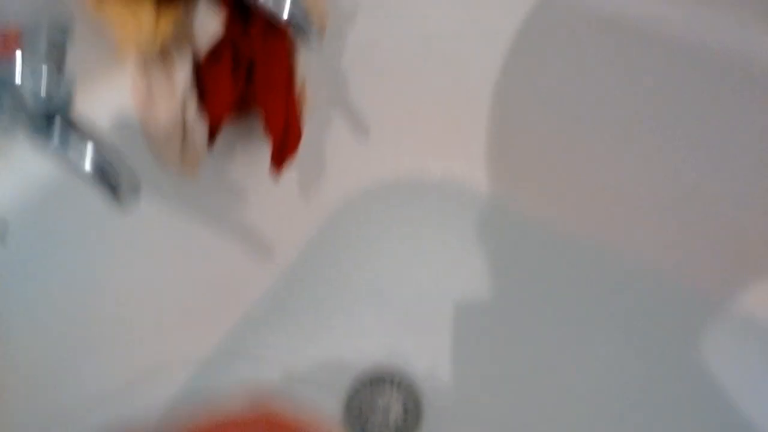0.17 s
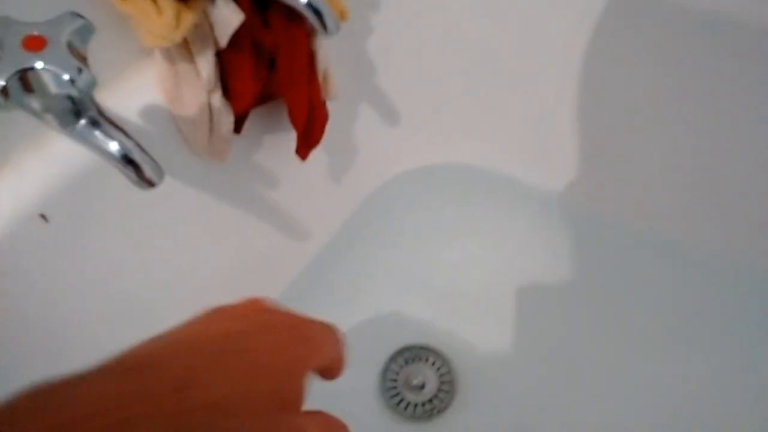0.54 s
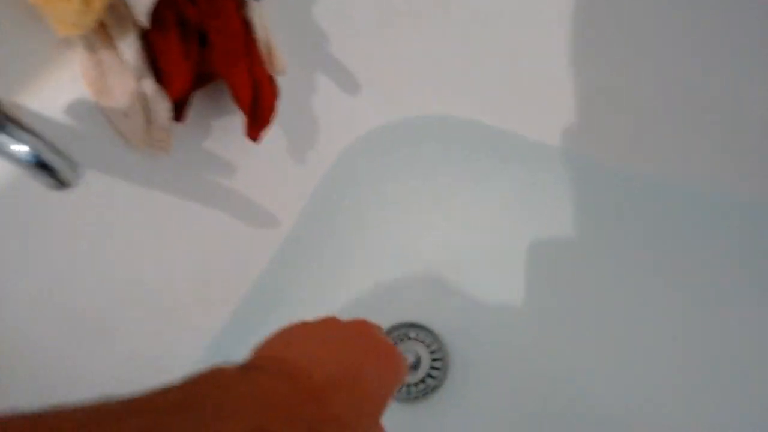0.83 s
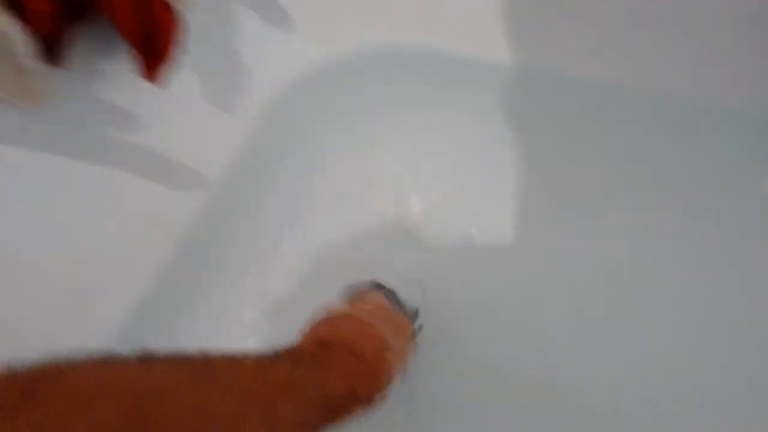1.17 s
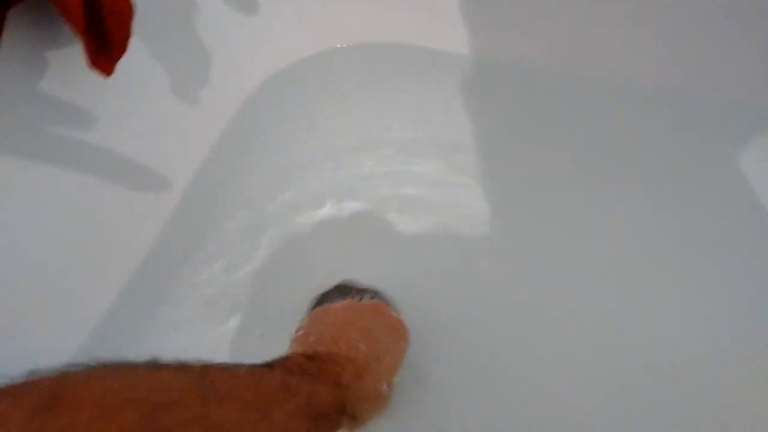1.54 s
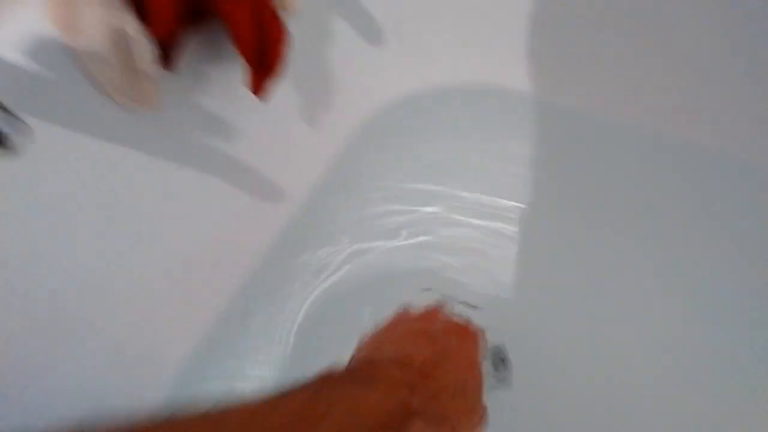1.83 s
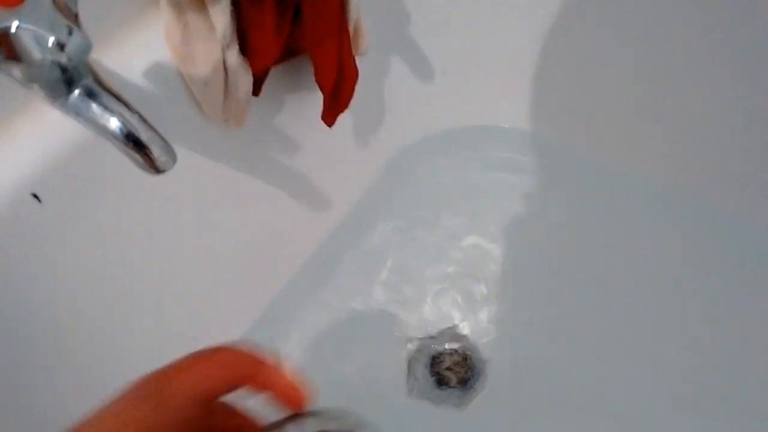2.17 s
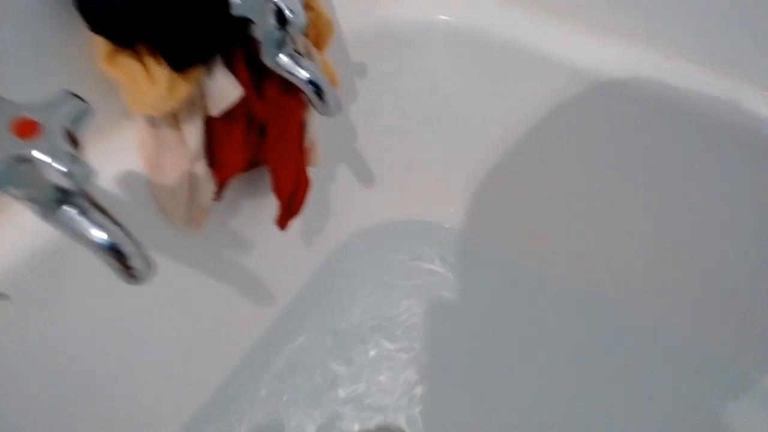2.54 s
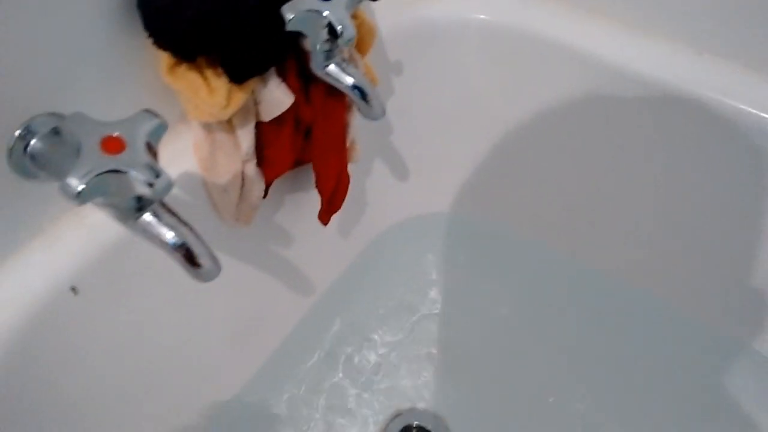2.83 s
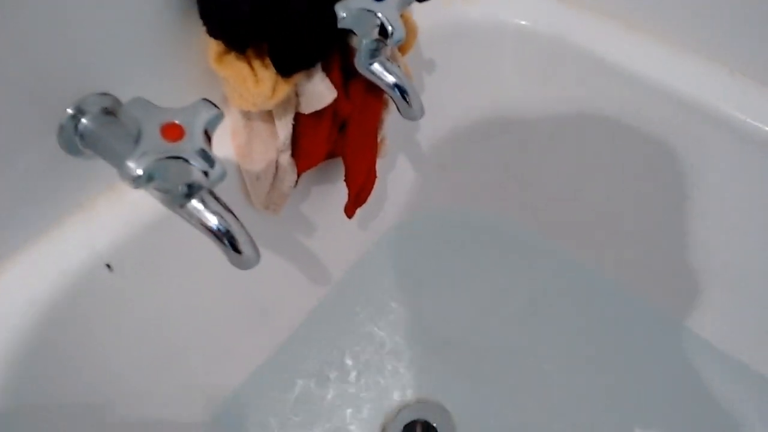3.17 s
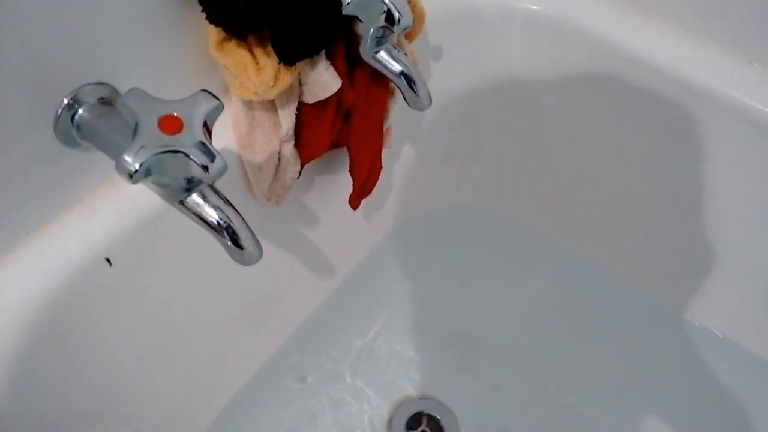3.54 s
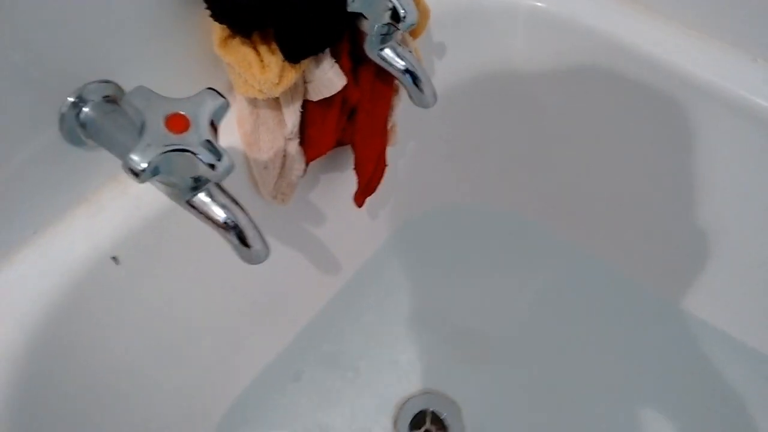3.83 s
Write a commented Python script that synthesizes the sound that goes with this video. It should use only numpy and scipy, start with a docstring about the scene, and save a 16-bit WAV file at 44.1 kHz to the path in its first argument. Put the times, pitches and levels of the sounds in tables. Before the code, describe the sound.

After faint dull knocks and one short splash, the plug comes out and bath water gulps and gurgles away with sharp bubble pops and a hollow pipe boom, heard close up in a short-echo bathroom.

```python
"""A small tiled bathroom: a hand bumps the tub, splashes into the bath water and lets it down the drain.
Bumps are noise-phased clusters of tub modes; splashes are slaps together with showers of droplet ticks.
Single bubbles are dying sines with a snap and froth; the gurgle and the vortex spray are crowds of them.
The waste pipe booms as resonances struck by random gulps. Hiss, rumble and a low hum lie underneath.
All but pipe and background ring in the room; the stereo left port hears treble late and is thinner."""
import sys
import numpy as np
from scipy import signal
from scipy.fft import rfft, irfft
from scipy.io import wavfile
from scipy.ndimage import uniform_filter1d

SR = 44100
rng = np.random.default_rng(int(sys.argv[2]) if len(sys.argv) > 2 else 0)


def output_pcm(signal):
    """Save a mono or channel-first signal as 16-bit PCM at the path in sys.argv[1].

    Samples are clipped to [-1, 1] before scaling.
    """
    pcm = np.clip(np.atleast_2d(signal).T, -1, 1) * 32767
    wavfile.write(sys.argv[1], SR, np.round(pcm).astype(np.int16))


N = 176400
T, HZ = np.arange(N) / SR, np.fft.rfftfreq(2 * N, 1 / SR)

# Background hiss and rumble: (frequency [Hz], relative density [dB per Hz])
HISS_COLOUR = [(25, -5), (47, 6.5), (70, -6), (150, -16.5), (480, -15), (1100, -26.5), (1950, -28.5),
               (2300, -40.5), (2900, -26.5), (4100, -30.5), (5000, -34), (11500, -30), (16000, -32)]
HISS_DB, HUM_HZ, HUM_DB = -47.5, 50.2, -51
START_S = 0.082  # the sound opens here
HISS_FADE_S, HISS_FADE_HZ = 0.15, 3280  # time constant of the treble fade-in; where treble begins

# Dull bumps and sloshes against the tub: (time [s], pitch [Hz], level [dB], decay to 1/e [s])
TUB_BUMPS = [(.092, 440, -44, 0.12), (0.333, 54.6, -39.5, 0.12), (0.393, 420, -46, 0.071),
             (0.551, 74, -38, 0.035), (2.72, 130, -31, 0.085), (2.93, 82.2, -32.5, 0.046),
             (1.761, 397, -48.5, 0.078), (1.825, 91, -43.5, 0.09), (2.401, 1080, -40, 0.013),
             (2.716, 414, -35.5, 0.03), (2.728, 1200, -29, 0.012), (3.971, 630, -34.5, .08),
             (2.362, 124, -34.5, 0.045), (3.819, 78, -32.5, 0.072), (3.85, 270, -34, 0.27)]
BUMP_WIDTH_OCTAVES, BUMP_ATTACK_S, BUMP_TOP_HZ = 0.34, 0.00037, 1860

# Loudness of the fine spray: (time [s], level [dB])
SPRAY_LEVEL = [(.1, -70.5), (.6, -61.5), (1.25, -66), (1.47, -43.5), (1.68, -66), (2.15, -64), (2.4, -51.5),
               (2.63, -56.5), (2.72, -40.5), (2.86, -43.5), (3.02, -44), (3.55, -51.5), (3.68, -46.5),
               (4, -52.5)]
# Colour of the fine spray: (frequency [Hz], relative level [dB])
SPRAY_TONE = [(2700, 2.5), (4800, -3), (11000, 7.5), (14500, 2)]
SPRAY_PER_S, SPRAY_SPREAD_DB, SPRAY_CYCLES = 1100, 3, 14  # cycles: mean length of a ring
TICKS_PER_S, TICK_SPREAD_DB, TICK_SHARE = 110, 5.5, 0.7  # share: tick gain beside the bursts

# Splashes and slurps: (time [s], level [dB], decay to 1/e [s], tilt [dB per octave])
SPLASH_EVENTS = [(.214, -50, 0.0027, 5), (1.402, -36, 0.0092, 0.5), (1.422, -39, 0.0037, -2),
                 (1.4272, -28.5, 0.014, 0.5), (1.452, -38, 0.011, -0.5), (1.805, -36.5, 0.0083, -5.5),
                 (2.206, -39, 0.036, -4.5), (2.3541, -27.5, 0.01, -4.5), (2.715, -35, 0.013, -2),
                 (2.757, -22.5, 0.0031, 10), (2.944, -33, 0.0043, 6.5), (3.009, -26, 0.0052, 7),
                 (3.0312, -27.5, 0.0033, 10), (3.133, -34.5, 0.01, 9), (3.349, -41.5, 0.0055, 5.5),
                 (3.641, -26, 0.0061, 24.5), (3.7929, -30, 0.00083, -0.5),]
# Colour of torn water: (frequency [Hz], relative level [dB])
SPLASH_COLOUR = [(60, -57), (300, -11.5), (800, -5), (1400, 4), (2400, -2.5), (4700, 2), (6500, -1),
                 (11000, 0), (16000, -6)]
DROPS_PER_S, DROP_SPREAD_DB = 4000, 3.5
CLUMP_DB = 2.5  # bunching of the droplets
SLAP, SLAP_S = 0.68, 0.007  # strength and 1/e length of the slap
CRACK, CRACK_UNDER_S = 9, 0.0044  # hard opening drop, strongest in splashes briefer than this decay

# Single bubbles, large and tiny: (time [s], pitch [Hz], level [dB], ring t60 [s])
SINGLE_BUBBLES = [(1.407, 1340, -27.5, 0.06), (1.4275, 1605, -22, 0.036), (1.4536, 10260, -26.5, 0.022),
                  (2.179, 380, -31, 0.063), (1.728, 520, -36, 0.014), (2.279, 1162, -27.5, 0.035),
                  (2.405, 515.5, -30.5, 0.17), (2.476, 2460, -31.5, 0.057), (2.682, 1510, -28, 0.12),
                  (2.683, 3070, -30.5, 0.023), (2.7165, 3050, -23, 0.017), (2.748, 710, -27, 0.097),
                  (2.877, 2885, -27.5, 0.03), (2.927, 460, -37, 0.12), (3.011, 3250, -25, 0.025),
                  (3.135, 1764, -20, 0.017), (3.276, 1046, -14, 0.078), (3.426, 811.5, -23.5, 0.16),
                  (3.471, 808, -30, 0.034), (3.5798, 919, -18, 0.048), (3.662, 6660, -33.5, 0.027),
                  (3.6877, 2320, -24, 0.043), (3.728, 465, -30.5, 0.16), (3.733, 4550, -31, 0.017),
                  (3.7918, 3240, -20, 0.014), (3.974, 4180, -37.5, 0.06)]
BUBBLE_RISE, BUBBLE_ATTACK_S = 0.0013, 0.00021  # share of pitch gained over one ring; pinch-off time
SHARP, SETTLE_S = 0.096, 0.0031  # share by which any new bubble starts high; time constant to settle
FROTH_DB, FROTH_DECAY_S, FROTH_OCTAVES = -10, 0.021, 0.22  # beside the ring, before thinning in low bubbles
SNAP_DB, SNAP_S = -0.5, 0.00007  # pinch-off snap, before softening in low bubbles

# Flow down the drain: (time [s], level [dB])
DRAIN_FLOW = [(2.12, -35), (2.2, -10), (2.27, -2.5), (2.33, -18.5), (2.4, -2.5), (2.49, -7), (2.63, -2),
              (2.76, 1), (2.84, -4.5), (3.25, -1), (3.75, -1), (3.88, -4.5), (4, -1)]
# Colour of the gurgle, by bubble pitch: (frequency [Hz], relative bubble level [dB])
GURGLE_COLOUR = [(190, -12.5), (300, 3), (620, 4), (1100, 1), (1900, 1.5), (2400, 1)]
GURGLE_DB = -39  # before the flow curve
BUBBLE_GLIDE = 0.13  # largest share by which a crowd bubble's pitch slides, up or down
GURGLE_PER_S, GURGLE_SPREAD_DB, GURGLE_CYCLES, GULP_DB = 600, 3, 34, 3

# Waste pipe and tub resonances: (frequency [Hz], width [Hz], level before the flow curve [dB])
PIPE_MODES = [(36.5, 2.2, -45), (71, 9.6, -44), (109.2, 20.5, -36.5), (165.7, 13.5, -39.5),
              (249, 36.4, -48), (313, 61, -45.5), (460, 9.2, -44.5)]

# Reverberation of the tiles: (frequency [Hz], t60 [s])
ROOM_T60 = [(100, 0.28), (1500, 0.25), (4000, 0.24), (15000, 0.19)]
ROOM_DB, GURGLE_ROOM_DB, BUBBLE_ROOM_DB, ROOM_GAP_S = -2.5, -3, -6, 0.005  # gap: silence before reflections
# Left-right likeness of diffuse sound: (frequency [Hz], likeness [0 to 1])
LIKENESS = [(30, 0.089), (500, 0.2), (1100, 1), (2200, 0.02)]
# Tone of the left port: (frequency [Hz], level [dB])
LEFT_PORT = [(25, -11), (125, -1), (500, 0), (2000, -2), (7500, -3), (12000, -10), (16000, -18)]
LEFT_LAG_S, LAG_FROM_HZ = 0.000361, 1640  # full treble lag of the left port; half of it at this frequency
EDGE_HZ = 15700  # upper band limit


def amp(db):
    """Decibels to gain."""
    return 10 ** (np.asarray(db) / 20)


def unit(x):
    """Scales to rms 1."""
    return x / np.sqrt(np.mean(x ** 2) + 1e-20)


def read(points, hz=HZ):
    """Reads a table on a log-frequency axis."""
    f, value = np.transpose(points)
    return np.interp(np.log(hz + 1), np.log(f + 1), value)


def level(points):
    """A dB curve as gain over time."""
    return amp(np.interp(T, *np.transpose(points)))


def shape(x, gain):
    """Filters by a gain per frequency."""
    return irfft(rfft(x, 2 * N) * gain)[..., :N]


def add(mix, s, sound):
    """Mixes a sound in at a time."""
    part = mix[max(round(s * SR), 0):][:len(sound)]
    part += sound[:len(part)]


def clicks(per_s, spread_db, size=N):
    """Random impulses of either sign, a few much larger than the rest."""
    height = amp(spread_db * np.minimum(rng.exponential(1, size), 4))
    sign = rng.choice([-1, 1], size)
    return height * sign * (rng.random(size) < per_s / SR)


def lumps(db, width, size=N):
    """A gain that swells and sinks at random, in lumps about width samples long."""
    swell = unit(uniform_filter1d(rng.standard_normal(size), size=width))
    return unit(amp(db * np.tanh(swell)))


def diffuse(pair):
    """Makes two unrelated channels as alike as the likeness table asks at each frequency."""
    same = np.clip(read(LIKENESS), -1, 1)
    blend = shape(pair[0], same) + shape(pair[1], np.sqrt(1 - same ** 2))
    return np.array([blend, pair[0]])


def bubble(hz, t60, rise):
    """A dying sine that starts sharp at pinch-off, settles, and slides as the current moves it."""
    t = np.arange(0, t60, 1 / SR)
    pitch = hz * (1 + rise * t / t60 + SHARP * np.exp(-t / SETTLE_S))
    turns = np.cumsum(pitch) / SR
    envelope = amp(-60 * t / t60) * (1 - np.exp(-t / BUBBLE_ATTACK_S))
    return envelope * np.sin(2 * np.pi * turns)


def crowd(colour, per_s, spread_db, cycles):
    """Bubbles born at random, each with its own size, life, strength and glide."""
    out, low, high = np.zeros(N), colour[0][0], colour[-1][0]
    for when, small, life, luck, bend in rng.random((round(per_s * N / SR), 5)):
        hz = low * (high / low) ** small
        ring = bubble(hz, cycles / hz * (.5 + life), BUBBLE_GLIDE * (2 * bend - 1))
        strength = amp(read(colour, hz) - spread_db * np.log(luck + .02))
        # the root of pitch makes up for the shorter rings of small bubbles
        add(out, when * N / SR, strength * np.sqrt(hz) * ring)
    return unit(out)


def background():
    """Microphone hiss whose treble fades in, room rumble and a low hum."""
    hiss = unit(diffuse(shape(rng.standard_normal((2, N)), amp(read(HISS_COLOUR)))))
    treble = shape(hiss, HZ ** 4 / (HZ ** 4 + HISS_FADE_HZ ** 4))
    hiss = hiss - treble * np.exp(-np.maximum(T - START_S, 0) / HISS_FADE_S)
    hum = np.sin(2 * np.pi * HUM_HZ * T)
    return amp(HISS_DB) * hiss + amp(HUM_DB) * hum


def bumps(size=32768):
    """Soft blows wake a cluster of damped tub modes."""
    out, hz, t = np.zeros(N), np.fft.rfftfreq(size, 1 / SR), T[:size]
    for s, centre, db, decay in TUB_BUMPS:
        body = 1 / (1 + abs(np.log2((hz + 1) / centre) / BUMP_WIDTH_OCTAVES) ** 3)
        body = body / (1 + (hz / BUMP_TOP_HZ) ** 12)
        phase = np.exp(2j * np.pi * rng.random(len(hz)))
        ring = unit(irfft(np.sqrt(body) * phase))
        envelope = (1 - np.exp(-t / BUMP_ATTACK_S)) * np.exp(-t / decay)
        add(out, s, amp(db) * ring * envelope)
    return out


def spray():
    """Tiny bubbles burst at the lip of the vortex, among dry droplet ticks."""
    bursts = crowd(SPRAY_TONE, SPRAY_PER_S, SPRAY_SPREAD_DB, SPRAY_CYCLES)
    dry_tone = amp(read(SPRAY_TONE)) * HZ ** 3 / (HZ ** 3 + 2700 ** 3)  # bass kept out
    ticks = unit(shape(clicks(TICKS_PER_S, TICK_SPREAD_DB), dry_tone))
    return level(SPRAY_LEVEL) * unit(bursts + TICK_SHARE * ticks)


def splashes(size=16384):
    """Each splash is a slap together with a quickly dying shower of droplet ticks."""
    out, hz, t = np.zeros(N), np.fft.rfftfreq(size, 1 / SR), T[:size]
    for s, db, decay, tilt_db in SPLASH_EVENTS:
        colour = amp(read(SPLASH_COLOUR, hz) + tilt_db * np.log2(hz / 1000 + .1))
        crack = CRACK * np.exp(-decay / CRACK_UNDER_S) * (np.arange(size) == 20)
        ticks = crack + clicks(DROPS_PER_S, DROP_SPREAD_DB, size)
        drops = unit(irfft(rfft(ticks) * colour))
        shower = lumps(CLUMP_DB, width=90, size=size) * np.exp(-t / decay)
        slap = SLAP * np.exp(-t / SLAP_S)
        add(out, s, amp(db) * drops * (shower + slap))
    return out


def plops(size=8192):
    """Each single bubble pinches off with a snap, rings, and sheds a froth of fragments near its pitch."""
    out, hz, t = np.zeros(N), np.fft.rfftfreq(size, 1 / SR), T[:size]
    for s, pitch, db, t60 in SINGLE_BUBBLES:
        near = 1 / (1 + (np.log2((hz + 1) / pitch) / FROTH_OCTAVES) ** 4)
        fragments = unit(irfft(rfft(clicks(DROPS_PER_S, DROP_SPREAD_DB, size)) * near))
        froth = fragments * np.exp(-t / FROTH_DECAY_S) * min(pitch / 2500, 1)
        snap = np.exp(-t / SNAP_S) * min(pitch / 1000, 1) ** 2
        add(out, s, amp(db + FROTH_DB) * froth)
        add(out, s, amp(db) * bubble(pitch, t60, BUBBLE_RISE))
        add(out, s, amp(db + SNAP_DB) * snap)
    return out


def gurgle():
    """A crowd of bubbles is dragged into the plughole in uneven gulps."""
    bubbles = crowd(GURGLE_COLOUR, GURGLE_PER_S, GURGLE_SPREAD_DB, GURGLE_CYCLES)
    gulps = lumps(GULP_DB, width=1800)
    return amp(GURGLE_DB) * level(DRAIN_FLOW) * gulps * bubbles


def pipe():
    """Gulps of air set the waste pipe and the tub booming."""
    gulps = np.array([clicks(160, 2.13), clicks(160, 0.88)])
    resonance = 0
    for hz, width, db in PIPE_MODES:
        mode = 1 / (1 + 1j * (HZ - hz) / width) ** 2
        resonance = resonance + amp(db) * mode / np.sqrt(np.mean(abs(mode) ** 2))
    return diffuse(shape(unit(gulps), resonance)) * level(DRAIN_FLOW)


def bathroom(x, wet_db):
    """Direct sound, its treble reaching the left port late, and dense reflections from tub and tiles."""
    taps = diffuse(np.array([clicks(4000, 2), clicks(4000, 2)]))[:, :SR]
    hz, t, z = signal.stft(taps, SR, nperseg=256)
    fading = z * amp(-60 * t / read(ROOM_T60, hz)[:, None])  # each band dies at its own pace
    tail = signal.istft(fading, SR, nperseg=256)[1][:, :SR] * (T[:SR] > ROOM_GAP_S)
    wet = signal.fftconvolve(x[None], tail / np.linalg.norm(tail[1]), axes=1)[:, :N]
    lag = LEFT_LAG_S * HZ ** 2 / (HZ ** 2 + LAG_FROM_HZ ** 2)
    direct = np.array([shape(x, np.exp(-2j * np.pi * HZ * lag)), x])
    return direct + amp(wet_db) * wet


def scene():
    """Water and tub ring in the bathroom, over the pipe and the background."""
    water = bathroom(splashes() + spray(), ROOM_DB)
    tub_and_drain = bathroom(bumps() + gurgle(), GURGLE_ROOM_DB)
    single_bubbles = bathroom(plops(), BUBBLE_ROOM_DB)
    return water + tub_and_drain + single_bubbles + pipe() + background()


def record(dry):
    """The left port is thinner at both ends; the sound opens just after the start and is band-limited."""
    opening = np.clip((T - START_S) / 0.022, 0, 1)
    ports = np.array([shape(dry[0], amp(read(LEFT_PORT))), dry[1]]) * opening
    lowpass = signal.firwin(301, EDGE_HZ, window=("kaiser", 9), fs=SR)
    return signal.oaconvolve(ports, lowpass[None], "same")


dry = scene()
out = record(dry)
output_pcm(out)
```